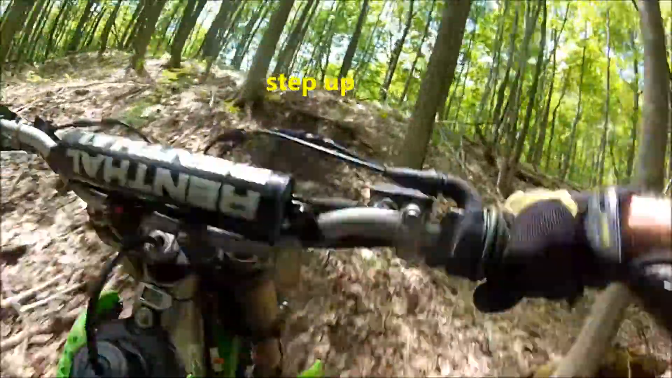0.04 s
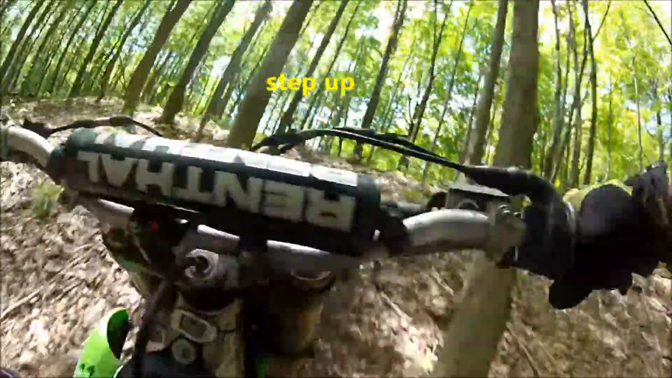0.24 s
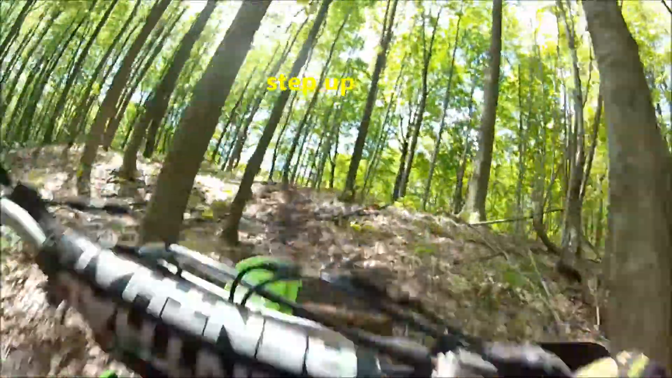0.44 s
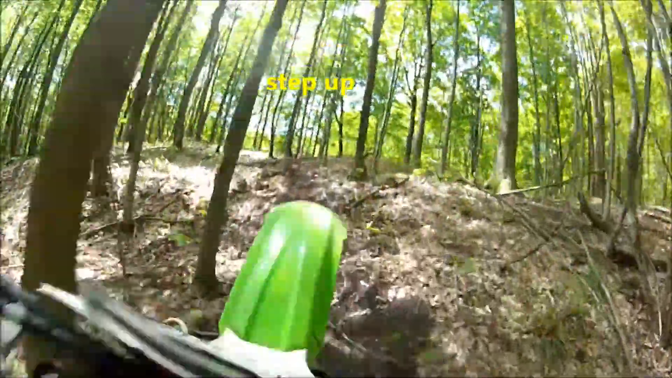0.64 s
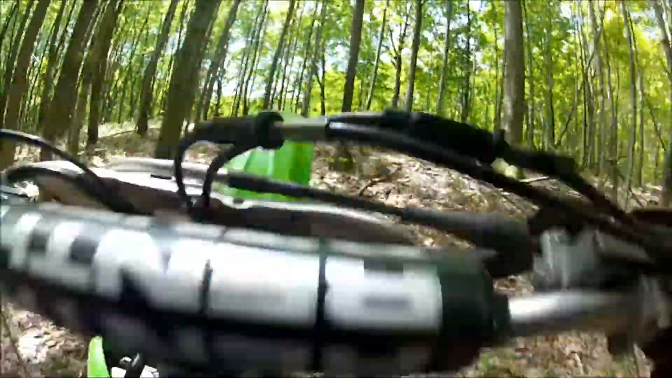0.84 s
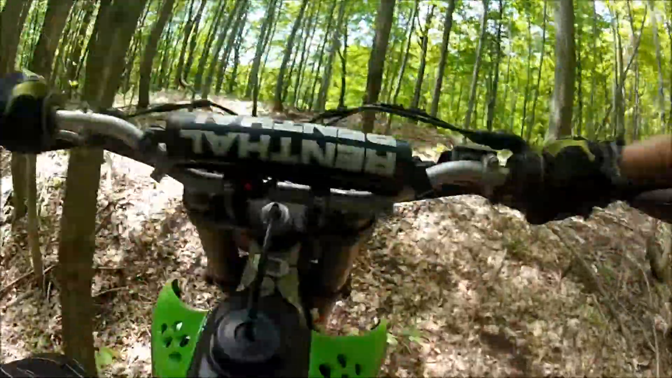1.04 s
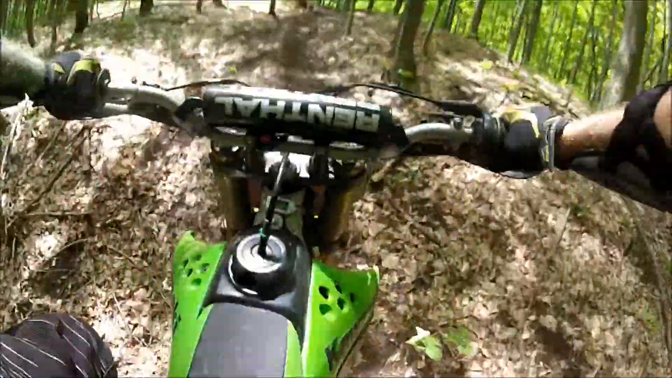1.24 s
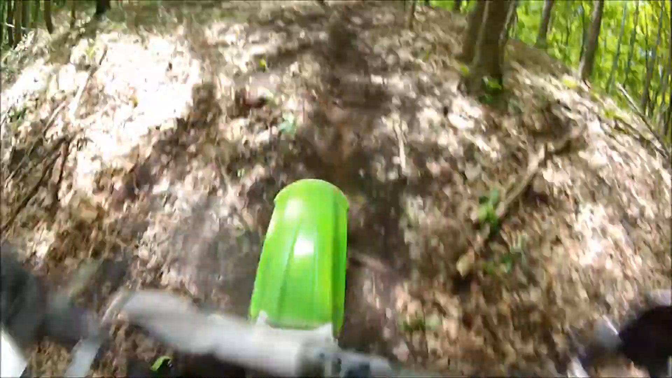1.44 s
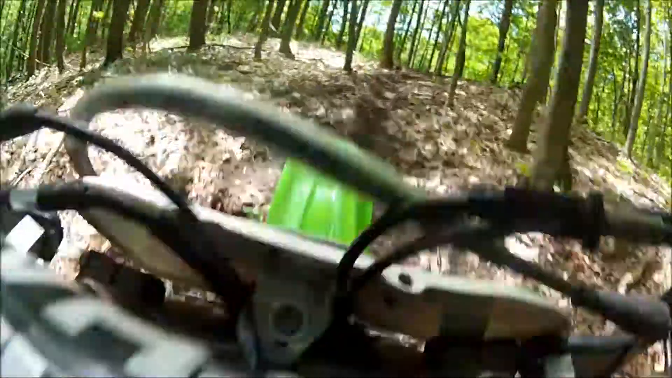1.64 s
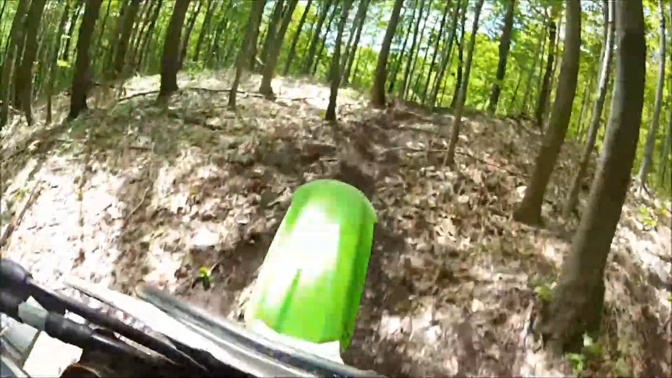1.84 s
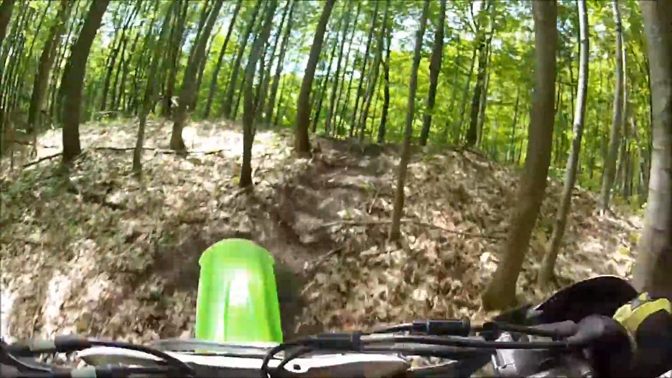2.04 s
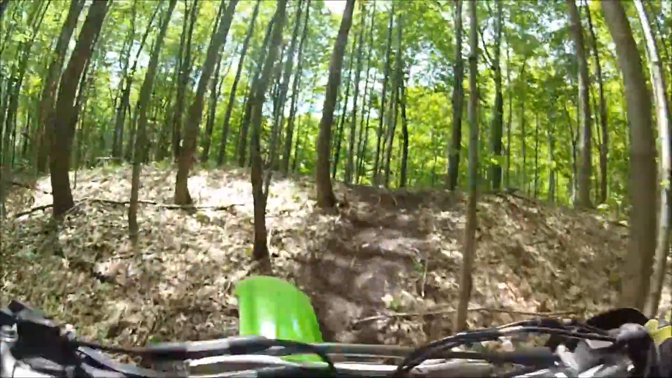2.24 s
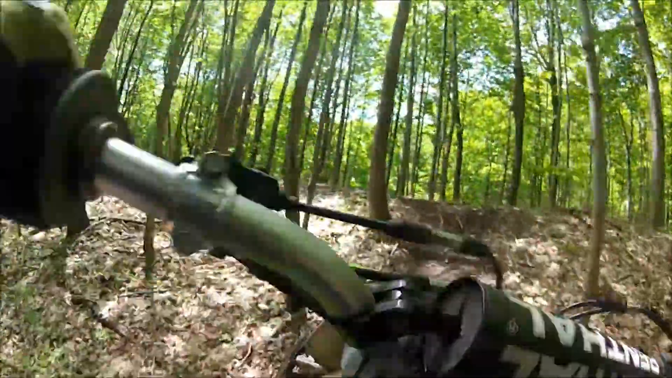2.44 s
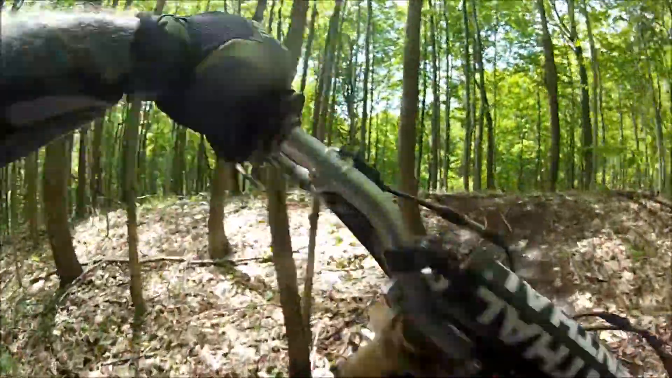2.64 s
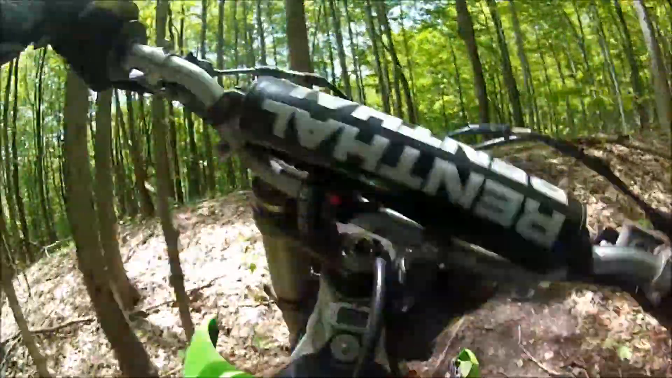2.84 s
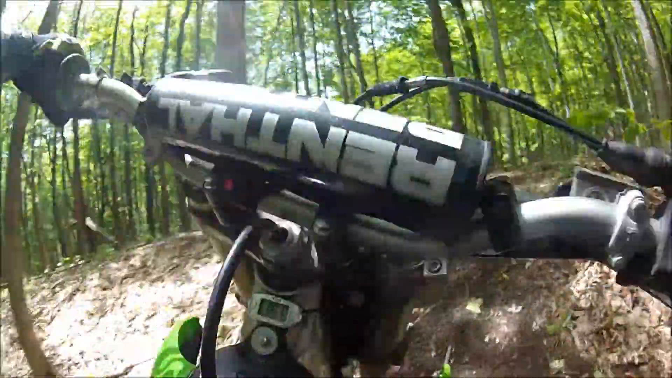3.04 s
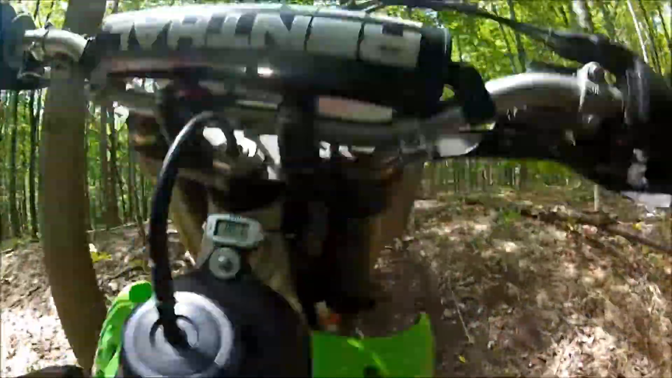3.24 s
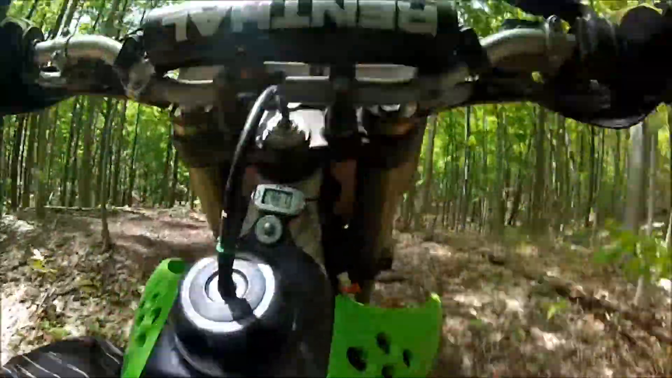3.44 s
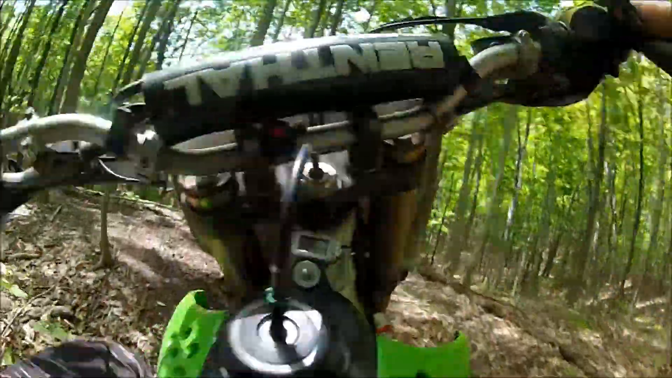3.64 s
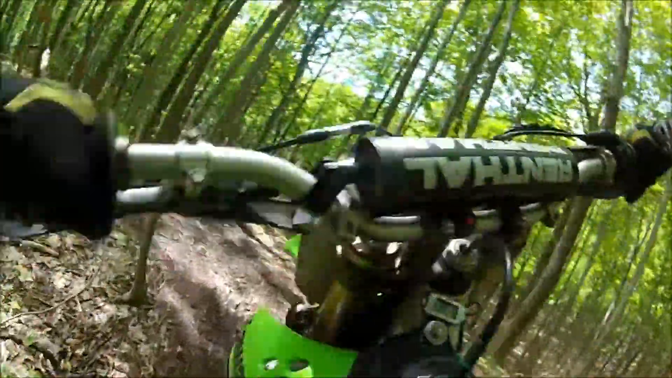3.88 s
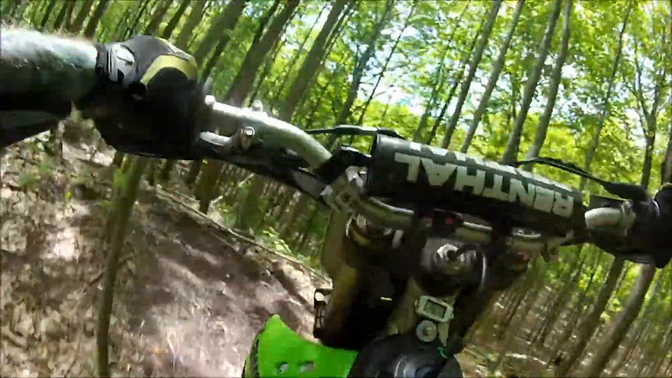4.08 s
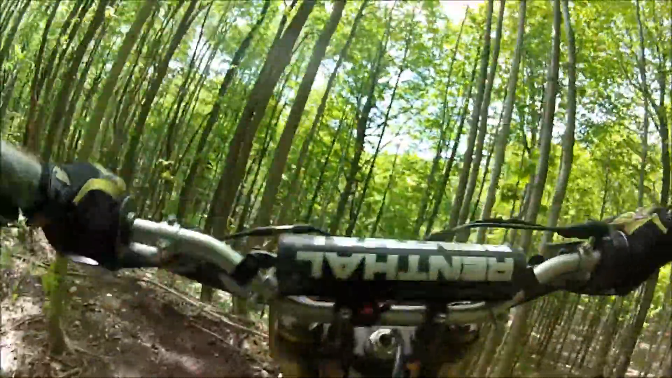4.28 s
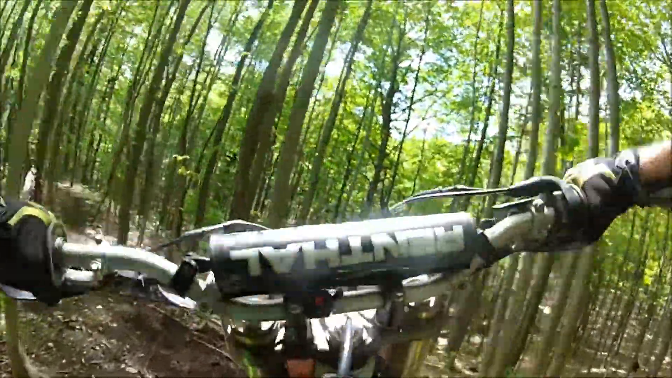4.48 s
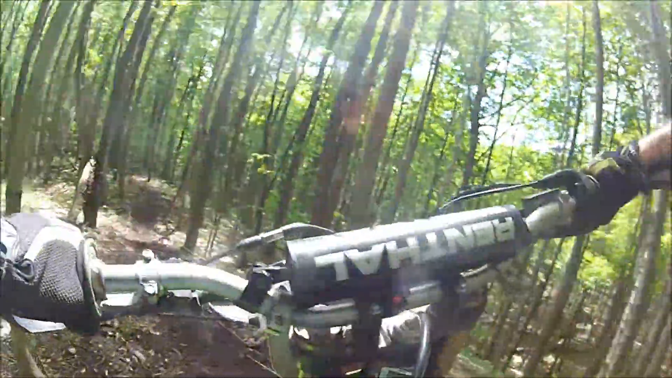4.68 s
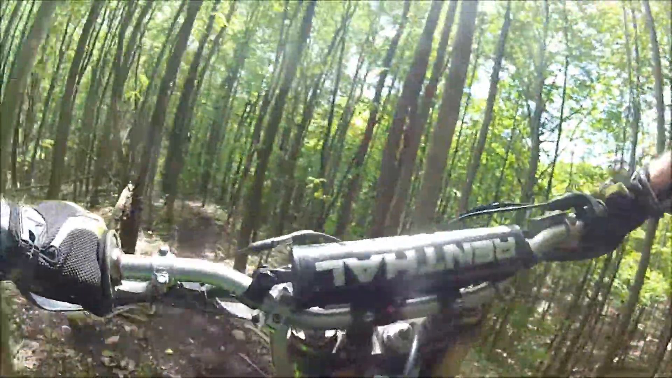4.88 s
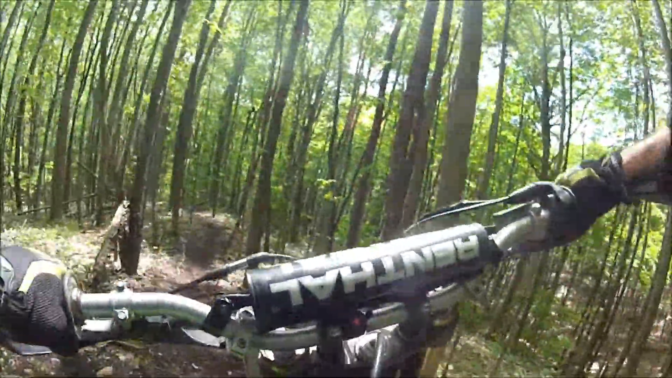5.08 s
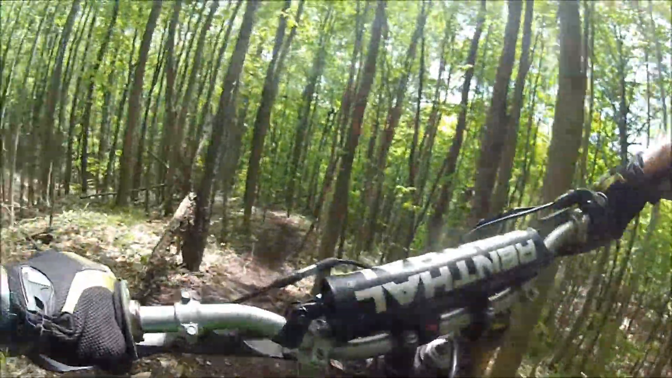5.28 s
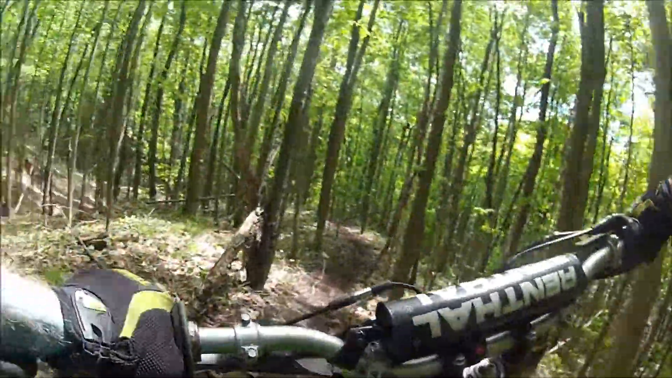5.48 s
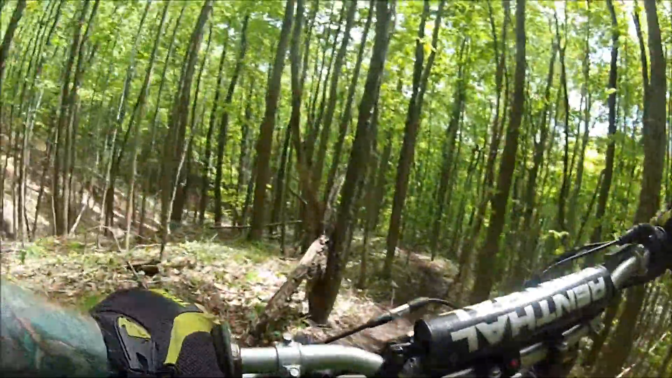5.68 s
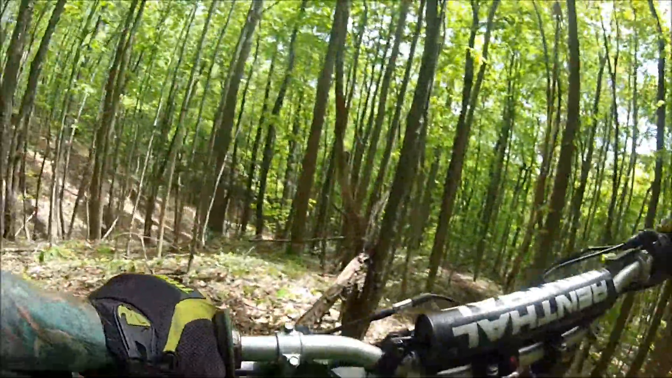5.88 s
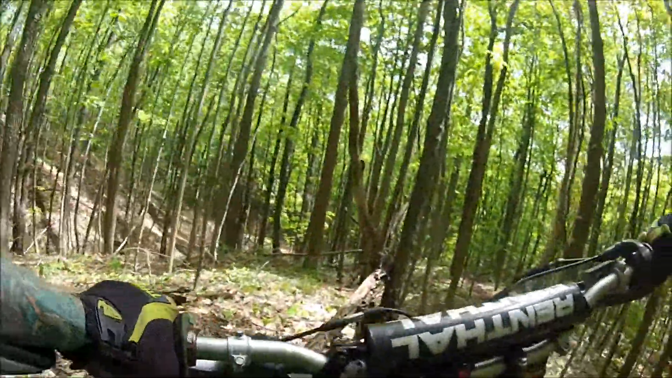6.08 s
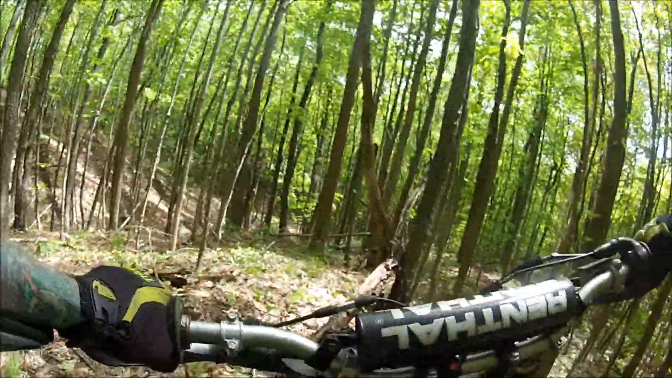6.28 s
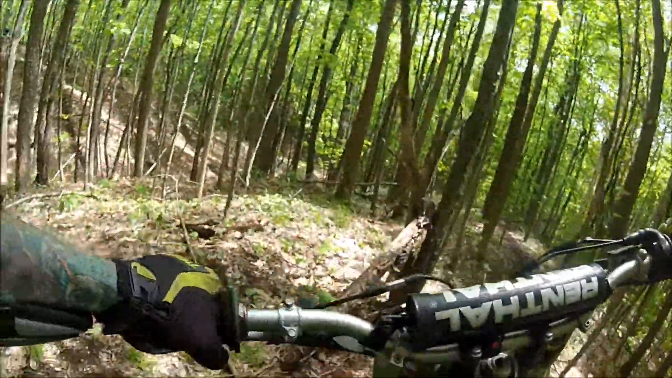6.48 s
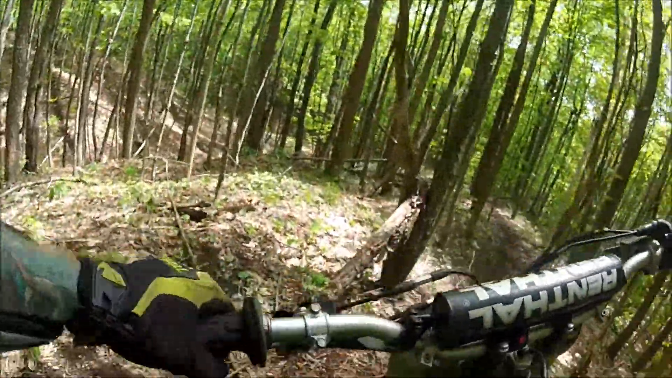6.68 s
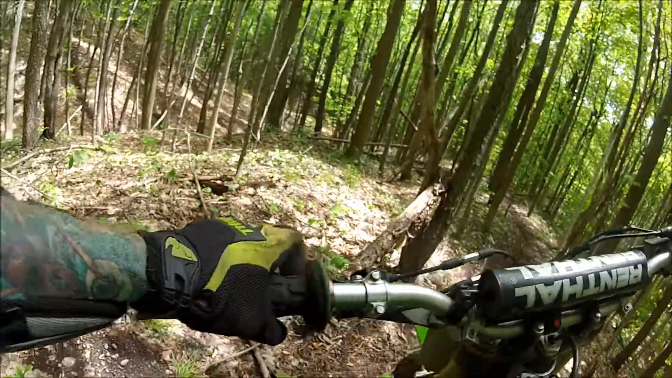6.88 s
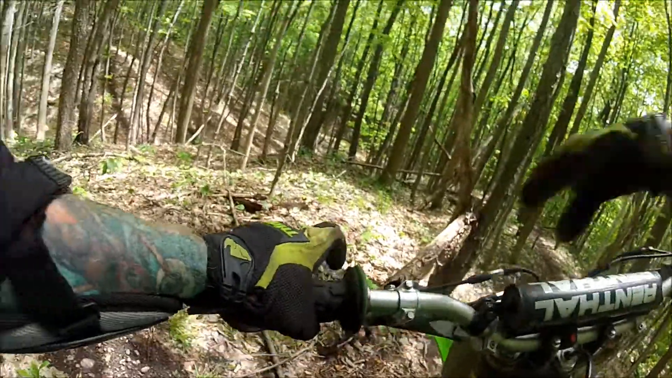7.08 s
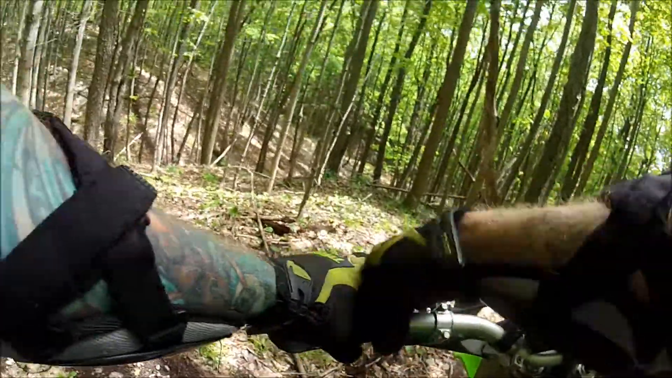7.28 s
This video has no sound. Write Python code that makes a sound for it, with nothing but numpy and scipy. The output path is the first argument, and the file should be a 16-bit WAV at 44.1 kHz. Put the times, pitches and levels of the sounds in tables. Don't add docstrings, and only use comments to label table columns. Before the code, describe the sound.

Close, boxy, gritty sound of a single-cylinder motorcycle on rough forest ground. Quick throttle stabs make the pitch leap and fall over a harsh plastic rattle; sharp blows overload the microphone, which briefly ducks. Low wind buffeting lies underneath. Then the revs fall away to slow separate thumps at idle, with cloth-like rubbing, a brief squeal and faint forest air.

```python
import sys
import numpy as np
from scipy import signal
from scipy.fft import rfft, irfft, next_fast_len
from scipy.io import wavfile
from scipy.ndimage import uniform_filter1d, map_coordinates

SR = 44100
rng = np.random.default_rng(int(sys.argv[2]) if len(sys.argv) > 2 else 0)


def wav_out(sig):
    wavfile.write(sys.argv[1], SR, np.round(np.clip(np.atleast_2d(sig).T, -1, 1) * 32767).astype(np.int16))


def rack_gain(trim_db):
    fader = np.asarray(trim_db, float)
    return 10 ** (fader / 20)


N = 322812
T = np.arange(N) / SR

# (frequency [Hz], width [Hz], level [dB])
CASE_LOW = [(1014, 69, 6), (1310, 139, 3), (1662, 35, 3.5)]
CASE_HIGH = [(1970, 200, 8)]
CASE_TOP = [(2865, 91, 7), (3765, 360, 8.5), (4540, 90, -28)]
# (frequency [Hz], width [Hz], level [dB])
CHEST_PLATE = [(240, 150, 0), (450, 300, -6)]


def firing():
    # (time [s], rate [firings/s])
    speed = [(-0.0, 58.2), (0.342, 38.86), (0.886, 30.27), (1.061, 25.82), (1.64, 36.19), (2.114, 26.03),
             (2.553, 28.75), (2.84, 38.3), (3.207, 34.89), (3.86, 35.51), (3.99, 38.06), (4.686, 22.59),
             (5.46, 19.42), (5.647, 17.06), (6.36, 14.85), (6.5, 15.72), (6.679, 14.63), (7.32, 16.32)]
    # (start [s], peak [s], end [s], extra rate [firings/s])
    revs = [
        (.386, .509, .65, 22.24),
        (.513, .735, .886, 34.49),
        (1.14, 1.286, 1.347, 16.11),
        (1.257, 1.545, 1.699, 55.19),
        (1.813, 2.001, 2.192, 10.55),
        (2.833, 3.0, 3.094, 21.49),
        (3.398, 3.562, 3.754, 18.04),
    ]
    rate = curves(speed)[0]
    for start, peak, end, extra in revs:
        rate = rate + np.interp(T, [start, peak, end], [0, extra, 0])
    return rate


def cycles():
    return np.cumsum(firing()) / SR - .04


def pulls():
    # (open [s], shut [s], frame shake [dB], strap tension [dB], gas flow [dB])
    throttle = [(-.1, 0.189, 7, 2, 16.5), (0.21, 0.375, 5, 2, 15.5), (0.387, .43, 6, 5, 25),
                (0.432, 0.503, 8.5, 6.5, 29), (0.472, 0.737, 12, 0, 27.5), (0.774, 0.968, 7.5, -0.5, 10),
                (0.955, 1.22, 7, -2, 2.5), (1.245, 1.38, 7.5, 1, 24.5), (1.37, 1.519, 12.5, 3.5, 24),
                (1.584, 1.627, 2.5, 7, 22), (1.692, 1.87, 13.5, -9.5, 22.5), (1.85, 2.037, 12, -6.5, 23.5),
                (2.077, 2.12, 6.5, 1.5, 11), (2.239, 2.427, 12, -10, 19), (2.417, 2.629, 10.5, -0.5, 20.5),
                (2.656, 2.913, 13.5, 0, 24.5), (2.893, 3.014, 13.5, -3, 24), (3.037, 3.245, 10.5, 5, 17.5),
                (3.302, 3.511, 17, 0, 27.5), (3.531, 3.604, 14.5, -7.5, 7), (3.59, 3.672, 13.5, -3.5, 3),
                (3.696, 3.716, -1.5, 6.5, 11), (3.826, 4.034, 6.5, 2, 22), (4.028, 4.222, 11, 4, 18),
                (4.238, 4.36, 5.5, -2, -13)]
    open_s, shut_s = 0.028, 0.068
    shapes = []
    for start, shut, *_ in throttle:
        full = start + open_s
        release = max(shut, full)
        shapes.append(np.interp(T, [start, full, release, release + shut_s], [0, 1, 1, 0]))
    shapes = np.array(shapes)
    shares = shapes / np.maximum(shapes.sum(axis=0), 1)
    return np.array(throttle)[:, 2:].T @ shares


def level(part):
    coast_db = dict(buzz=-41, low=-43, thump=-46, bark=-57.5, hum=-61, puff=-63)
    per_octave_db = dict(buzz=8.5, low=7, thump=13, bark=4.5, hum=20.5, puff=-4.5)
    return coast_db[part] + per_octave_db[part] * np.log2(firing() / 30)


def exhaust():
    # (frequency [Hz], width [Hz], level [dB])
    silencer = [(205, 200, 0)]
    # (frequency [Hz], width [Hz], level [dB])
    gas_slug = [(95, 110, 0)]
    # (frequency [Hz], width [Hz], level [dB])
    silencer_boom = [(248, 65, 0)]
    # (frequency [Hz], level [dB])
    tail_pipe = [(100, -69.5), (240, -4), (345, 10.5), (440, 2.5), (550, 2), (800, -2.5), (1200, -13.5),
                 (3000, -47.5)]
    # (multiple of the turning rate, level [dB])
    crank = [(1, 4), (2, 3), (3, 0), (4, -1), (5, -4), (6, -7)]
    # (start [s], end [s], level [dB])
    booms = [
        (0.403, 0.496, -26),
        (2.798, 2.955, -31.5),
        (3.07, 3.153, -33),
    ]

    frame_db, strap_db, gas_db = pulls()
    missed_db = -10 * np.exp(-((T - 6.61) / .03) ** 2)
    thump_db = level("thump") + 1.037 * frame_db + .95 * strap_db - 0.32 * gas_db
    thump_db = np.clip(thump_db, -48, -32) + missed_db
    bark_db = level("bark") + gas_db + missed_db
    hum_db = level("hum") + 0.062 * frame_db

    done = cycles()
    count = np.arange(1, int(done[-1]) + 1)
    luck = rng.standard_normal((len(count), 2))
    when = np.interp(count + .005 * luck[:, 0], done, T) - .0005
    uneven_db = np.clip(40 / np.interp(when, T, firing()), 1, 2.4)
    pulses = np.zeros(N)
    pulses[(when * SR).astype(int)] = rack_gain(uneven_db * luck[:, 1])

    echo_s, idle_rate = .011, 16
    def two_echoes(f):
        once = np.exp(-2j * np.pi * f * echo_s)
        return .6 * once + .3 * once ** 2
    pulses = pulses + filtered(pulses, two_echoes) * np.clip(idle_rate / firing(), 0, 1)
    gate = signal.lfilter([1], [1, -np.exp(-1 / (.008 * SR))], pulses)
    flow = unit(pulses) + .2 * unit(gate * rng.standard_normal(N))

    thump = rack_gain(thump_db) * steady(ringing(ringing(flow, silencer), silencer), 0.264)
    bark = rack_gain(bark_db) * steady(coloured(flow, tail_pipe), 0.12)
    puff = rack_gain(level("puff") + missed_db) * steady(ringing(ringing(pulses, gas_slug), gas_slug), 0.24)
    snap = np.zeros(N)
    for start, end, db in booms:
        swell = np.sin(np.pi * np.clip((T - start) / (end - start), 0, 1)) ** .5
        snap += rack_gain(db) * swell * (T < end)
    boom = snap * steady(ringing(ringing(pulses, silencer_boom), silencer_boom), .1)
    hum = np.zeros(N)
    for multiple, db in crank:
        hum += np.sqrt(2) * rack_gain(db + wobble(7.7)) * np.sin(4 * np.pi * round(multiple) * done)
    return thump + bark + rack_gain(hum_db) * hum - puff + boom


def rattle():
    # (frequency [Hz], width [Hz], level [dB])
    buzz_low = [(670, 200, -11.5), (1025, 244, -4.5), (1255, 84, 4.5), (1587, 245, -5.5), (1880, 22, -1)]
    buzz_high = [(1823, 55.6, -2), (2191, 143, -1.5), (3043, 84, -14), (3622, 80, -14.5), (5136, 180, -27)]
    # (frequency [Hz], width [Hz], level [dB])
    panel = [(2230, 41, 11), (1806, 270, -18.5), (2890, 72, -25)]
    # (frequency [Hz], level [dB])
    loose_parts = [(40, -29), (300, 2), (800, 2.5), (2200, 1.5), (3500, -6), (5900, -23.5)]

    frame_db, strap_db, gas_db = pulls()
    low_db = level("low") + frame_db + strap_db
    high_db = level("buzz") + frame_db
    gathered = .35 + .02 * gas_db - .025 * strap_db - .8 * np.log2(np.maximum(firing() / 32, 1))
    struck = np.clip(1.2 * (np.clip(gathered, 0, 1) - .45), 0, .7)
    gathered = np.clip(gathered, 0, 1)

    turns = 2 * (cycles() + .33)
    size = rack_gain(1.5 * rng.standard_normal(int(turns[-1]) + 2))[turns.astype(int)]
    size = size * np.where(turns % 2 > 1, np.clip(firing() / 58, .4, 1) ** 1.5, 1)
    age = turns % 1 / .17
    burst = steady(size * np.sqrt(age) * np.exp(-age), 0.196)
    shake = np.sqrt(gathered * burst ** 2 + 1 - gathered)

    def drive():
        return shake * rack_gain(1.5 * wobble(170)) * rng.standard_normal(N)
    shared = drive()
    low = unit(ringing(shared + 1.22 * drive(), buzz_low))
    high = unit(ringing(shared + 1.42 * drive(), buzz_high))
    strikes = steady(ringing(size * np.diff(turns // 2, prepend=0), panel), 0.214)
    high = np.sqrt(1 - struck) * high + np.sqrt(struck) * strikes
    hiss = unit(coloured(0.15 * drive() + rng.standard_normal(N), loose_parts))
    return rack_gain(low_db) * low + rack_gain(high_db) * (high + rack_gain(-7) * hiss)


def knocks():
    # (time [s], peak [dB], upper modes [dB], top modes [dB])
    sharp = [(0.066, -12, 5, -12), (0.454, -10.5, 3.5, -16), (0.876, -1.5, 3.5, -14.5),
             (0.941, -17, 4, -30), (1.046, -12.5, -10, -22), (1.251, -7, 6, -38), (1.572, 9, 4, -6.5),
             (1.616, -8.5, 8, -6), (1.656, 3, 9, -5), (2.699, -9, 2, -15.5), (3.046, -11.5, 1, -9),
             (3.078, -8.5, -4, -22), (3.092, -7.5, 1.5, -16), (3.122, -8, -8, -5.5), (3.145, -8.5, 5, -7.5),
             (3.809, -5, 10.5, 1), (3.82, -14, -3, -19), (4.069, -12.5, -2, -15), (4.091, -5.5, 11, -7),
             (4.105, -11, 23, 7.5), (4.147, 3, 9.5, -4), (4.181, -9.5, -3, -2), (4.194, -17, 7, -1),
             (4.226, -22, 10, -2), (4.283, -21.5, 5, -5.5), (6.196, -21.5, -16, -20), (7.311, -36, -5, 10)]
    # (time [s], peak [dB], upper modes [dB], top modes [dB])
    padded = [
        (2.253, -34, 12, -10),
        (3.281, -13, -1.5, -27),
        (3.319, -6.5, 4.5, -17),
        (3.972, -6.5, -0.5, -17.5),
        (4.629, -12, -1, -34),
        (4.972, -34, 6, -19),
    ]

    out, t = np.zeros(N + SR), np.arange(SR // 16) / SR
    tap = np.eye(1, N)[0]
    bodies = (CASE_LOW, CASE_HIGH, CASE_TOP, CHEST_PLATE)
    parts = np.array([ringing(tap, modes)[:len(t)] for modes in bodies])
    blows = [(*row, -12, .0019) for row in sharp] + [(*row, -5, .0028) for row in padded]
    for s, db, high_db, top_db, thud_db, length in blows:
        thud_db = thud_db + 0.26 * max(high_db, 0)
        length = np.clip(length + .00002 * db, 3e-4, .01)
        contact = t < 2e-4
        crunch = np.exp(-t / length) * (.39 * rng.standard_normal((4, len(t))) + contact)
        crunch[-1] = (t > .002) & (t < .003)
        rings = signal.fftconvolve(crunch, parts, axes=1)[:, :len(t)]
        rings /= np.abs(rings).max(axis=1, keepdims=True)
        levels = rack_gain([db - 0.5, db + high_db - 1.5, db + top_db + 4.5, db + thud_db])
        out[round(s * SR):][:len(t)] += levels @ rings
    return filtered(out[:N], lambda hz: (1j * hz / (1j * hz + 110)) ** 2)


def case(low, high, thud):
    upper = ringing(high, CASE_HIGH) + rack_gain(-17.0) * ringing(high, CASE_TOP)
    return ringing(low, CASE_LOW) + upper + ringing(thud, CHEST_PLATE)


def rubs():
    # (start [s], end [s], level [dB], rate [slips/s], thud [dB])
    drags = [(4.511, 4.588, -33, 190, -4), (4.655, 4.75, -42.5, 130, 3), (5.456, 5.52, -40.5, 67, -1),
             (5.516, 5.57, -24, 147, -5), (5.61, 5.667, -36.5, 92, -2), (5.673, 5.74, -35, 83, 1),
             (6.173, 6.277, -34.5, 146, -3.5), (6.408, 6.48, -46, 170, 4.5), (6.948, 7.2, -42, 125, -1),
             (7.238, 7.32, -37.5, 140, -2.5), (7.297, 7.327, -27, 250, -10)]
    force = np.zeros((3, N))
    for start, end, db, rate, thud_db in drags:
        luck = rng.random((60, 2))
        steps = 0.47 + 1.2 * luck[:, 0]
        when = start + (np.cumsum(steps) - steps[0]) / rate
        keep = when < min(end, T[-1])
        slips = np.zeros(N)
        slips[(when[keep] * SR).astype(int)] = rack_gain(10 * luck[keep, 1] - 5)
        slips += .0015 * ((T > start) & (T < end))
        slips *= .4 + .8 * np.sin(np.pi * np.clip((T - start) / (end - start), 0, 1))
        force += rack_gain([[db], [db - 7.5], [db + thud_db]]) * slips
    scratch = signal.lfilter([1], [1, -np.exp(-1 / (0.0018 * SR))], force)
    cloth = uniform_filter1d(scratch * rng.standard_normal((3, N)), size=6)
    return rack_gain(19.5) * case(*cloth)


def squeak():
    # (time [s], frequency [Hz], level [dB])
    pivot = [
        (6.775, 2100, -40),
        (6.79, 2130, -49),
        (6.815, 2230, -35.5),
        (6.83, 2270, -45),
    ]
    hz, db = curves(pivot)
    on = (T > pivot[0][0]) & (T < pivot[-1][0])
    return on * rack_gain(db + 1.8 * wobble(150)) * np.sin(2 * np.pi * np.cumsum(hz) / SR)


def wind():
    # (time [s], peak [dB])
    gusts = [(0, -52), (.5, -48), (.74, -48), (1.16, -43), (1.45, -48), (1.67, -44), (2.15, -58),
             (2.8, -48), (3.1, -41), (3.33, -47), (3.81, -46), (3.99, -41), (4.52, -58), (5.14, -58),
             (5.4, -60), (6.08, -58), (6.48, -63), (6.75, -66)]
    # (frequency [Hz], level [dB])
    colour = [(12, -34), (25, -14), (42, 39), (65, 4), (120, 17), (200, -24), (400, -55), (2000, -120)]
    rumble = coloured(rng.standard_normal(N), colour)
    fade, calm_db = 70, -70
    gust_db = np.max([db - fade * np.abs(T - s) for s, db in gusts], axis=0)
    return rack_gain(np.maximum(gust_db, calm_db) + 1.5 * wobble(12)) * steady(rumble, .3)


def air():
    # (frequency [Hz], level [dB])
    forest = [(40, -27), (110, -2), (300, -52), (2500, -15), (5900, -14)]
    return rack_gain(-60) * unit(coloured(rng.standard_normal(N), forest))


def unit(x):
    return x / np.sqrt(np.mean(x ** 2) + 1e-20)


def steady(x, span):
    return x / np.sqrt(np.abs(uniform_filter1d(x ** 2, int(span * SR))) + 1e-12)


def curves(rows):
    s, *cols = np.transpose(rows)
    return [np.interp(T, s, c) for c in cols]


def wobble(rate):
    return map_coordinates(rng.standard_normal(int(N * rate / SR) + 4), [T * rate])


def filtered(x, response):
    m = next_fast_len(N + SR // 2)
    return irfft(rfft(x, m) * response(np.fft.rfftfreq(m, 1 / SR)), m)[..., :N]


def coloured(x, points):
    hz, db = np.transpose(points)
    def response(f):
        cep = irfft(np.log(rack_gain(np.interp(np.log(f + 1), np.log(hz), db))))
        half = len(cep) // 2
        cep[1:half] *= 2
        cep[half + 1:] = 0
        return np.interp(f, np.linspace(0, SR / 2, half + 1), np.exp(rfft(cep)))
    return filtered(x, response)


def ringing(x, modes):
    def response(f):
        total = 0
        for k, (centre, width, db) in enumerate(modes):
            damping = 1j * f * width
            total = total + (-1) ** k * rack_gain(db) * damping / (centre * centre - f * f + damping)
        return total
    return filtered(x, response)


def scene():
    return (exhaust() + rattle() + knocks() + rubs() + squeak() + wind() + air())[None]


def top_cut(x):
    return signal.sosfilt(signal.butter(12, 15760, fs=SR, output="sos"), x)


def record(dry):
    # (time [s], drop [dB], recovery [s])
    ducks = [
        (0.88, 1.5, 0.032),
        (1.576, 21, 0.046),
        (1.664, 7.5, 0.024),
        (3.151, 8, 0.33),
        (3.817, -2, 0.017),
        (4.11, 31, 0.052),
    ]
    drop_db = sum(db * (T > s) * np.exp(-np.abs(T - s) / back) for s, db, back in ducks)
    x = dry * rack_gain(-uniform_filter1d(drop_db, 90))
    x = x / (1 + np.abs(x) ** 6) ** (1 / 6)
    x = x - uniform_filter1d(x - dry * rack_gain(-drop_db), 400)
    hold_hz, top_hz = 12000, 15350
    x = filtered(x, lambda hz: np.clip((hold_hz / 2 - hz) / 300, 0, 1))
    x = x * (1 + 2 * np.cos(2 * np.pi * hold_hz * T))
    x = filtered(x, lambda hz: np.sinc(hz / hold_hz) / np.sinc(hz / (4 * hold_hz)) * (hz < top_hz))
    return top_cut(x)


dry = scene()
out = record(dry)
wav_out(out)
```